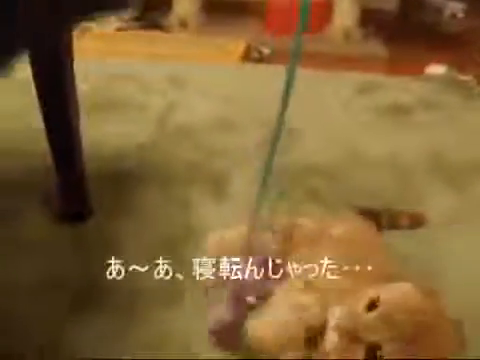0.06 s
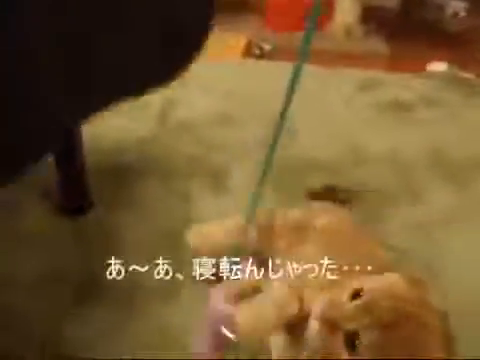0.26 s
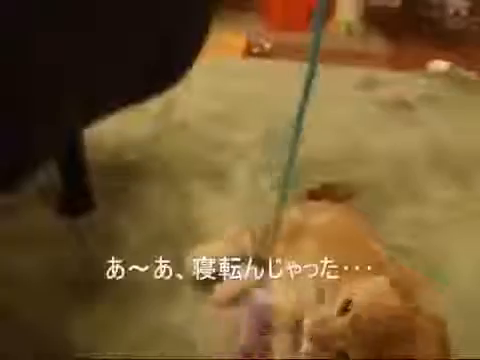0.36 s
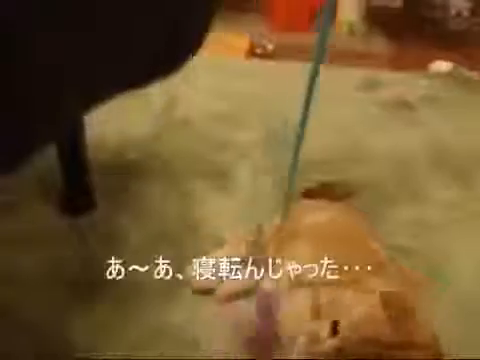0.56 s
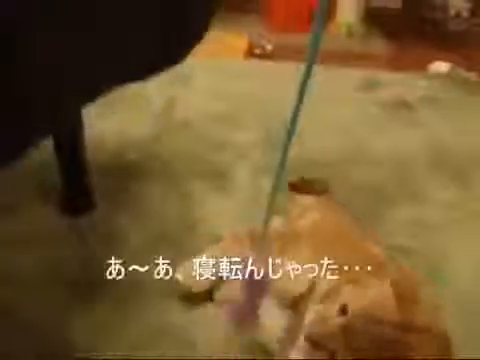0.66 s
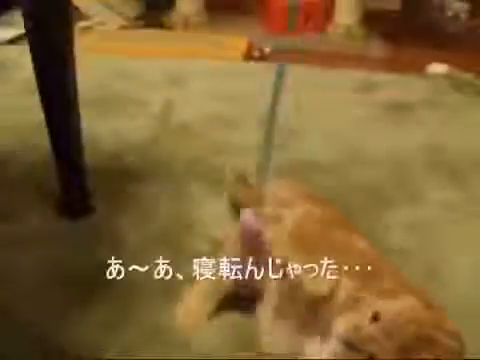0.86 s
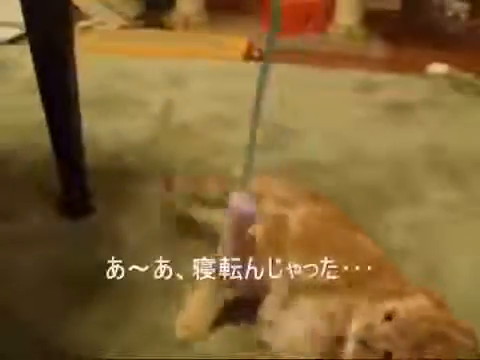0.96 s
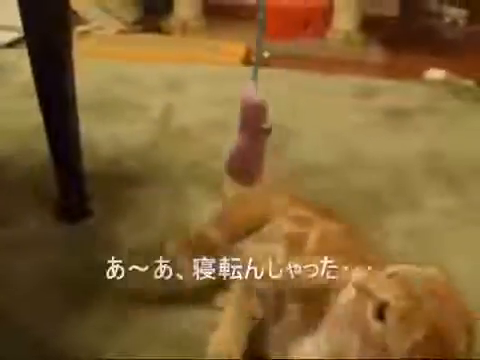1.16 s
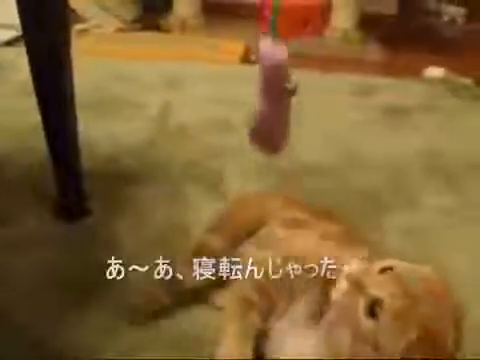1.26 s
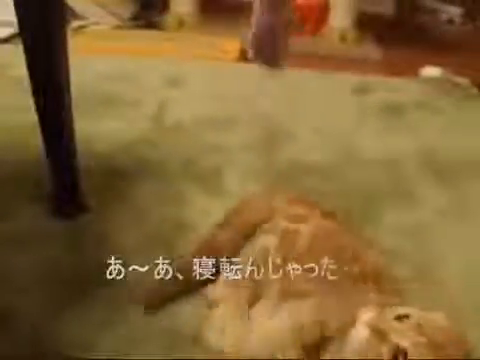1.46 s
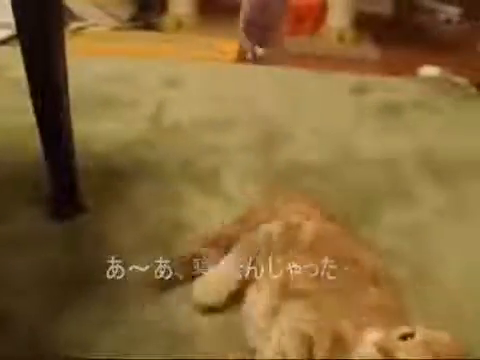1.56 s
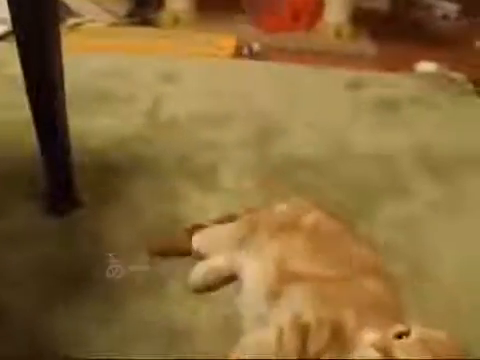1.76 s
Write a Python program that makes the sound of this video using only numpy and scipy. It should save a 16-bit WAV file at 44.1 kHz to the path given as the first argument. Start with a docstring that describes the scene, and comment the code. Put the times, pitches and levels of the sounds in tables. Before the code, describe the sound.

A small bell jingles close by in a carpeted room, swelling and dropping irregularly while a kitten paws at a dangling toy. The toy thuds softly, and the thin ringing dies down over a constant hiss.

```python
"""A quiet carpeted room: a kitten bats a plush teaser toy, whose tiny bell jingles in uneven bursts.
The pellet strikes and chokes one high ring in turn; the toy thuds; two faint low hoots sound.
A coarse 8-bit recorder holds each sample, mirroring the ring into metallic tones over hiss."""
import sys
import numpy as np
from scipy import signal
from scipy.fft import rfft, irfft
from scipy.io import wavfile

SR = 44100
rng = np.random.default_rng(int(sys.argv[2]) if len(sys.argv) > 2 else 0)


def wav_record(signal):
    """Record a signal, one row per channel, as 16-bit PCM in the file named by sys.argv[1]."""
    frames = np.transpose(np.atleast_2d(signal))
    bounded = np.clip(frames, -1, 1)
    # unit amplitude maps onto the largest positive 16-bit level
    quanta = np.round(bounded * 32767).astype(np.int16)
    wavfile.write(sys.argv[1], SR, quanta)


N = 79380
CONTACT_S = .0003  # pellet contact time


def undb(db):
    """Decibels to gain."""
    return 10 ** (np.asarray(db) / 20)


def fade(t, t60_s):
    """Exponential decay, 60 dB per t60_s."""
    return np.exp(-np.log(1000) * t / max(t60_s, 1e-3))


def soften(x):
    """Spread each step over the contact time."""
    pole = np.exp(-2 / (SR * CONTACT_S))
    for _ in range(2):
        x = signal.lfilter([1 - pole], [1, -pole], x)
    return x


def mode(blows, hz, t60_s):
    """One decaying resonance, struck by the blows."""
    pole = fade(1 / SR, t60_s) * np.exp(2j * np.pi * hz / SR)
    return signal.lfilter([1], [1, -pole], blows + 1e-18).imag


def room(rms_db=-55.5):
    """Steady dull noise of a quiet room."""
    # noise spectrum (frequency [Hz], relative density [dB])
    spectrum = [(25, -4), (80, 0.5), (160, -4.5), (350, -4), (700, -9.5), (1500, -12), (4000, -15.5),
                (8000, -17.5), (12000, -46.5)]
    hz, db = np.array(spectrum).T
    bins_hz = np.maximum(np.arange(N // 2 + 1) * SR / N, 1)
    gain = undb(np.interp(np.log(bins_hz), np.log(hz), db))
    noise = irfft(rfft(rng.standard_normal(N)) * gain, N)
    return undb(rms_db) * noise / noise.std()


def bell(ring_db=2, bounces_per_s=260, jog_rad=.14, scatter_db=2.5):
    """Each pellet contact chokes and restarts the ring; small bounces jog its phase and level."""
    # pellet contacts (time [s], relative level [dB], t60 [s], ring pitch [Hz])
    contacts = [(0.001, -35, 0.13, 7865), (0.0365, -31.5, 0.37, 7760), (0.0445, -43.5, 0.31, 7828),
                (0.1343, -31, 0.021, 7879), (0.1453, -42, 0.287, 7739), (0.1752, -40.5, 0.353, 7746),
                (0.1882, -33, 0.32, 7768), (0.2131, -27, 0.353, 7762), (0.2341, -39.5, 0.27, 7904),
                (0.26, -39, 0.353, 7782), (0.269, -21, 0.039, 7741), (0.2979, -27, 0.353, 7707),
                (0.3029, -19, 0.16, 7722), (0.3119, -33, 0.22, 7863), (0.3249, -25, 0.39, 7800),
                (0.3328, -8.5, 0.056, 7755), (0.3438, -15, 0.086, 7716), (0.3807, -31.5, 0.353, 7728),
                (0.3937, -27.5, 0.1, 7698), (0.4216, -28.5, 0.051, 7806), (0.4376, -27.5, 0.046, 7878),
                (0.4446, -22, 0.23, 7724), (0.4645, -29.5, 0.029, 7812), (0.4745, -34, 0.3, 7730),
                (0.5035, -46.5, 0.32, 7701), (0.5663, -41.5, 0.58, 7843), (0.5733, -29, 0.047, 7846),
                (0.5813, -23.5, 0.071, 7772), (0.5863, -23.5, 0.079, 7763), (0.6252, -33.5, 0.066, 7744),
                (0.6441, -30, 0.212, 7733), (0.6641, -23.5, 0.12, 7752), (0.694, -30, 0.049, 7860),
                (0.705, -16.5, 0.037, 7801), (0.7349, -36.5, 0.47, 7698), (0.7459, -32.5, 0.3, 7747),
                (0.7629, -22, 0.353, 7693), (0.7758, -18.5, 0.0094, 7723), (0.7808, -24, 0.035, 7818),
                (0.7928, -31.5, 0.353, 7759), (0.8155, -29.5, 0.052, 7833), (0.833, -32.5, 0.1, 7812),
                (0.8656, -32.5, 0.353, 7889), (0.8756, -24, 0.072, 7798), (0.8828, -17.5, 0.024, 7771),
                (0.8912, -15, 0.045, 7833), (0.9162, -24.5, 0.044, 7746), (0.9262, -29, 0.052, 7784),
                (0.9355, -26, 0.024, 7878), (0.9435, -20, 0.046, 7768), (0.9674, -33, 0.23, 7760),
                (0.978, -48, 0.3, 7825), (1.0103, -32, 0.31, 7765), (1.0382, -49, 0.56, 7795),
                (1.0811, -38.5, 0.18, 7782), (1.0909, -33, 0.045, 7768), (1.1024, -27, 0.076, 7749),
                (1.122, -27, 0.13, 7820), (1.1278, -25.5, 0.06, 7760), (1.1405, -29, 0.066, 7833),
                (1.165, -27, 0.11, 7872), (1.1825, -28.5, 0.043, 7832), (1.1939, -21, 0.028, 7755),
                (1.2049, -27, 0.037, 7820), (1.2108, -27, 0.045, 7730), (1.2325, -37, 0.08, 7690),
                (1.2411, -36.5, 0.04, 7726), (1.3274, -33, 0.016, 7755), (1.3525, -36.5, 0.02, 7766),
                (1.3565, -27.5, 0.022, 7848), (1.3705, -40.5, 0.06, 7782), (1.3748, -33.5, 0.025, 7864),
                (1.4184, -43.5, 0.063, 7956), (1.4294, -35, 0.353, 7657), (1.4343, -45, 0.05, 7750)]
    t = np.arange(N) / SR
    touches = rng.random(N) < bounces_per_s / SR
    bounces = touches * rng.standard_normal(N)
    click_noise = rng.standard_normal(N)
    bounce_index = np.cumsum(touches)
    bounce_gain = undb(scatter_db * rng.uniform(-2, 1, N))[bounce_index]
    chatter_turns = rng.random((2, N))  # phases, one row per chatter mode
    swing, blows = np.zeros((2, N), complex)
    ring_hz = np.full(N, float(contacts[0][3]))
    for start_s, db, t60_s, hz in contacts:
        i = int(start_s * SR)
        swing_phasor, blow_phasor = np.exp(2j * np.pi * rng.random(2))
        swing[i:] = undb(db) * fade(t[:N - i], t60_s) * swing_phasor
        blows[i] = undb(db) * blow_phasor
        ring_hz[i:] = hz
        until_next_bounce = bounce_index[i:] == bounce_index[i]
        bounce_gain[i:][until_next_bounce] = undb(scatter_db / 2)
    jogged = soften(swing * bounce_gain * np.exp(1j * jog_rad * np.cumsum(bounces)))
    carrier = np.exp(2j * np.pi * np.cumsum(ring_hz) / SR)
    ring = undb(ring_db) * np.imag(jogged * carrier)
    strikes = free_ring(blows) + clicks(blows, click_noise)
    return ring + strikes + scrape(abs(swing)) + chatter(bounces * abs(swing), chatter_turns)


def free_ring(blows, gain_db=-.5):
    """Faint modes that ring on through the contacts."""
    # bell modes (frequency [Hz], relative level [dB], t60 [s])
    free_modes = [(7717, -27, .3), (7365, -35, .3), (7450, -34, .2), (7328, -39, .25), (6570, -28, .02)]
    return sum(undb(db + gain_db) * mode(blows, hz, t60_s) for hz, db, t60_s in free_modes)


def clicks(blows, noise, gain_db=-27, decay_s=.0012):
    """Dry clicks of the pellet on the shell."""
    envelope = signal.lfilter([1], [1, -np.exp(-1 / (decay_s * SR))], abs(blows) + 1e-18)
    return undb(gain_db) * envelope * noise


def scrape(envelope, gain_db=-27):
    """Gritty hiss of the pellet rolling on the shell, following the ring's envelope."""
    grit = mode(rng.standard_normal(N) ** 3, hz=7305, t60_s=.0028)
    return undb(gain_db) * envelope * grit / grit.std()


def chatter(bounces, phase_turns):
    """Choked rings added by each small bounce."""
    # choked modes (frequency [Hz], relative level [dB], t60 [s])
    choked_modes = [(7880, -4, .011), (7557, -11, .006)]
    t, out = np.arange(N) / SR, np.zeros(N)
    for (hz, db, t60_s), turns in zip(choked_modes, phase_turns):
        taps = soften(bounces * np.exp(2j * np.pi * turns))
        out += undb(db) * mode(taps * np.exp(2j * np.pi * hz * t), hz, t60_s)
    return out


def echo(x, gain_db=-19.5, t60_s=.75):
    """Diffuse tail from walls and furniture."""
    tail = rng.standard_normal(SR) * fade(np.arange(SR) / SR, t60_s)
    return undb(gain_db) * signal.fftconvolve(x, tail / np.linalg.norm(tail))[:N]


def bumps(band_hz=(34.2, 200)):
    """Dull thuds as the plush toy is knocked about."""
    # toy bumps (time [s], level [dB], t60 [s])
    knocks = [(0.331, -42.5, .14), (.70, -51, 0.1), (0.879, -44, 0.19)]
    t = np.arange(N) / SR
    bandpass = signal.butter(2, band_hz, "band", fs=SR, output="sos")
    thud = signal.sosfilt(bandpass, rng.standard_normal(N))
    envelope = sum(undb(db) * (t >= at_s) * fade(abs(t - at_s), t60_s) for at_s, db, t60_s in knocks)
    return envelope * thud / thud.std()


def hoots():
    """Short soft tones whose pitch arches or falls."""
    # hoots (time [s], length [s], start pitch [Hz], middle pitch [Hz], end pitch [Hz], level [dB])
    glides = [(0.478, .074, 254.5, 349.6, 298, -43), (0.696, .047, 366.6, 327.7, 238.6, -41)]
    t, out = np.arange(N) / SR, np.zeros(N)
    for start_s, length_s, *pitches_hz, db in glides:
        progress = np.clip((t - start_s) / length_s, 0, 1)
        hz = np.polyval(np.polyfit([0, .5, 1], pitches_hz, 2), progress)
        envelope = undb(db) * np.sqrt(abs(np.sin(np.pi * progress)))
        out += envelope * np.sin(2 * np.pi * np.cumsum(hz) / SR)
    return out


def scene():
    """Bell and toy close by, hoots and room behind; mono."""
    jingle = bell()
    return (jingle + echo(jingle) + bumps() + hoots() + room())[None]


def record(dry, hold_hz=16000, step=1 / 128, bias_steps=.04, top_hz=14900):
    """Resample, round down to 8 bits, hold each value, low-pass."""
    slow = signal.resample(dry, N * hold_hz // SR, axis=1)
    coarse = step * np.floor(slow / step + bias_steps)
    held = coarse[:, np.arange(N) * hold_hz // SR]  # mirrors the ring about hold_hz / 2
    return signal.sosfilt(signal.ellip(10, .2, 70, top_hz, fs=SR, output="sos"), held)


dry = scene()
out = record(dry)
wav_record(out)
```